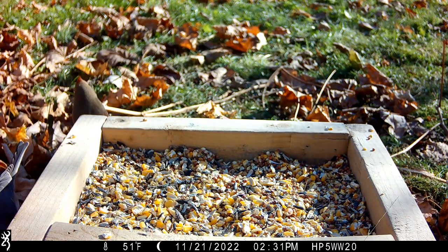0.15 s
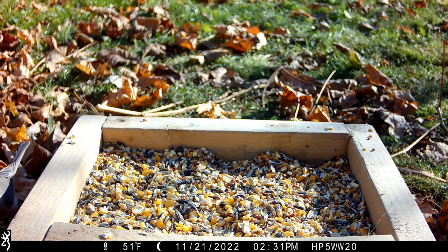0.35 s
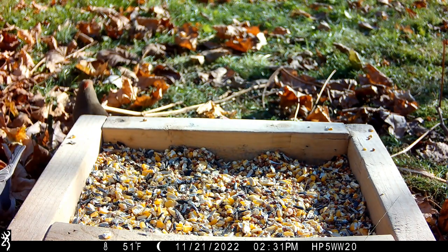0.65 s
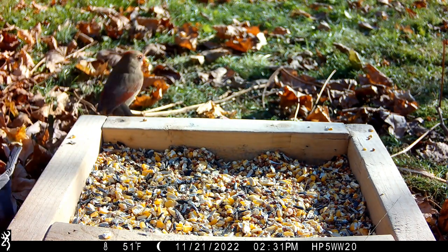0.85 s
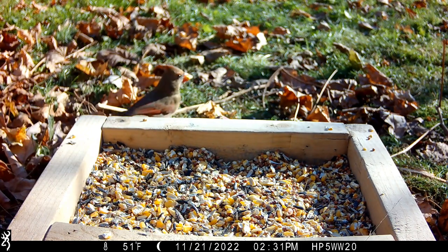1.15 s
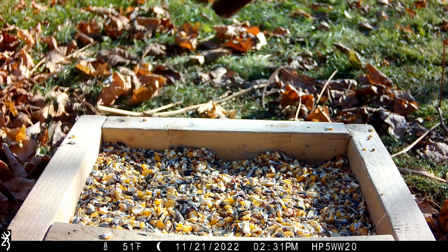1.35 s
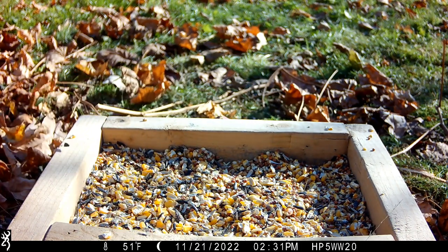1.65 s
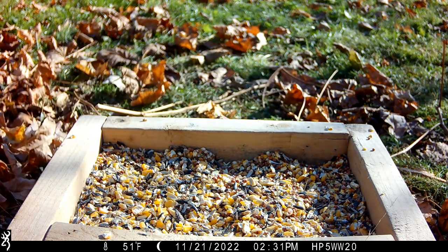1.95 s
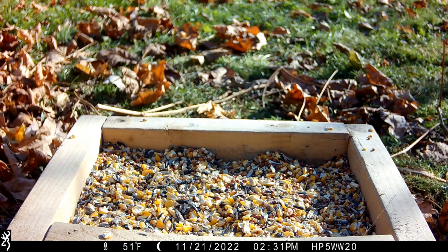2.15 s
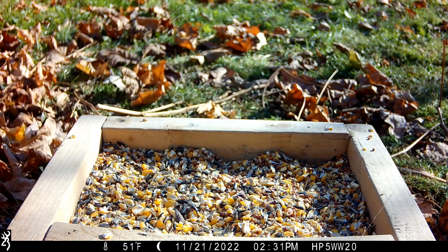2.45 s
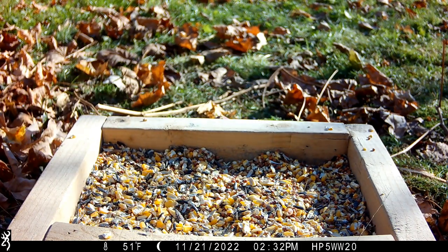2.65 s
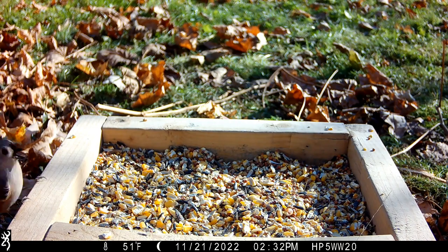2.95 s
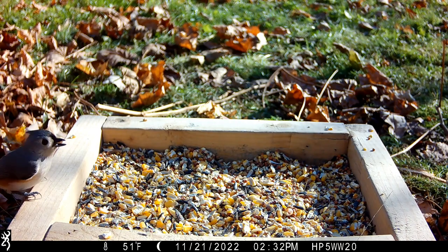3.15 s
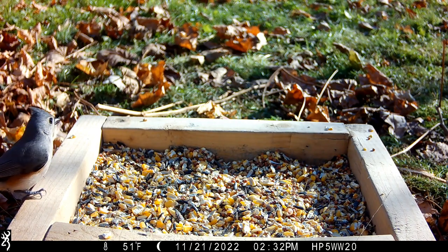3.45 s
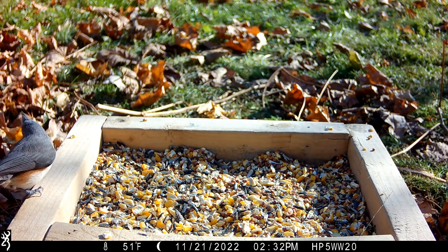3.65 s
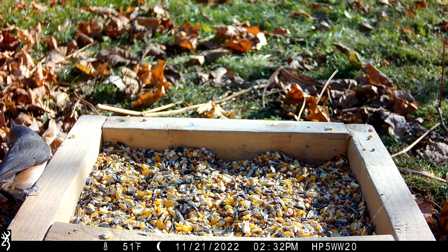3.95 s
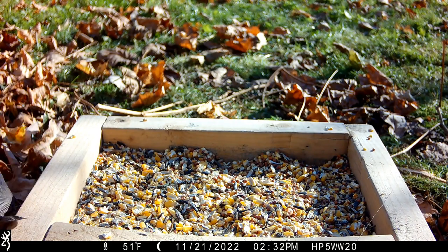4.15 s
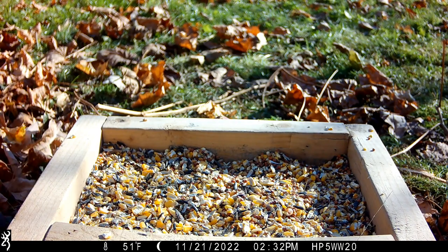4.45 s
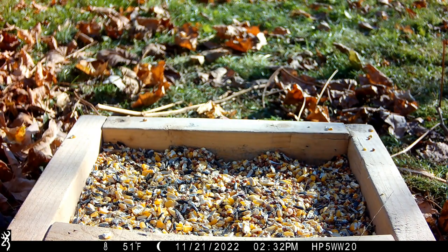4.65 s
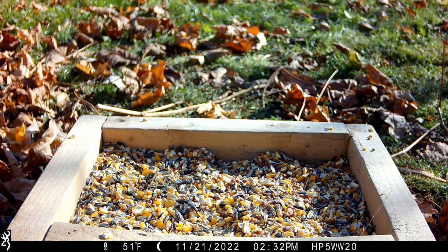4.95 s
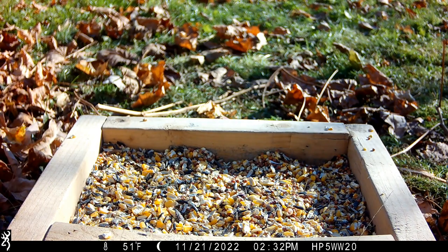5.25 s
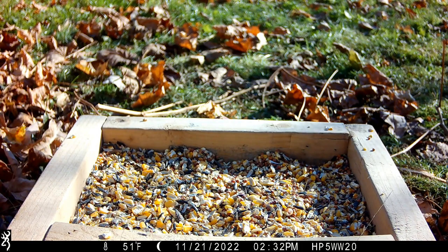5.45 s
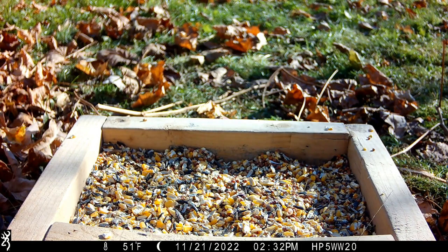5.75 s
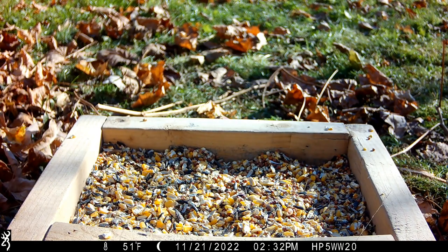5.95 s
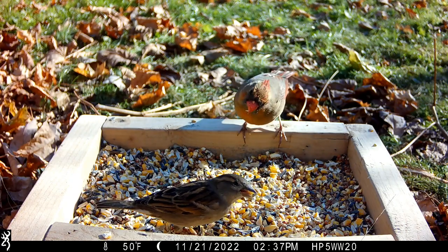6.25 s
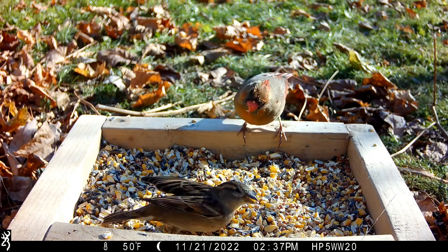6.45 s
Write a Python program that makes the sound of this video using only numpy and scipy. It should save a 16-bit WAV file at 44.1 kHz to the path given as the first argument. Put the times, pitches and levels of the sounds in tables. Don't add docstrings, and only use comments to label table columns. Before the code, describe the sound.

Close to a microphone in a quiet leafy yard, small birds flutter through dry leaves with brushing wing strokes and thin ticks, one giving a sharp high chip. After a lull, a small bird whistles high, plunges in pitch and gives three nasal buzzes. Claws then scrabble and knock on a wooden feeder tray, light rustles follow, and a last landing is cut short, leaving faint hiss.

```python
import sys
import numpy as np
from scipy import signal
from scipy.fft import rfft, irfft
from scipy.io import wavfile
from scipy.ndimage import uniform_filter1d

SR = 44100
rng = np.random.default_rng(int(sys.argv[2]) if len(sys.argv) > 2 else 0)


def wrap_up_sound(samples):
    columns = np.atleast_2d(samples).T
    tamed = np.clip(columns, -1, 1)
    steps = np.round(tamed * 32767).astype(np.int16)
    wavfile.write(sys.argv[1], SR, steps)


def elevation(decibels):
    levels = np.asarray(decibels, float)
    return 10 ** (levels / 20)


N = 291060
T = np.arange(N) / SR
CUT_S = 6.0338


def level(x, db):
    return x * elevation(db) / np.sqrt(np.mean(x ** 2))


def colour(x, points, lo=0, hi=SR):
    hz = np.linspace(1, SR / 2, 4097)
    points_hz, points_db = np.array(points).T
    db = np.interp(np.log(hz), np.log(points_hz), points_db)
    outside_hz = np.maximum(lo - hz, hz - hi)
    db = uniform_filter1d(db - 50 * np.clip(outside_hz / 400, 0, 1), size=9)
    cepstrum = irfft(db * np.log(10) / 20)
    cepstrum[1:4096] *= 2
    cepstrum[4097:] = 0
    response = irfft(np.exp(rfft(cepstrum)))
    return signal.fftconvolve(x, response)[:len(x)]


def walk(rate, count=N):
    hold = int(SR / rate)
    steps = np.repeat(rng.standard_normal(count // hold + 1), hold)
    return 1.3 * uniform_filter1d(uniform_filter1d(steps, hold), hold)[:count]


def bursts(rows, rise_s):
    env = np.zeros(N)
    for s, db, t60 in rows:
        i = int(s * SR)
        t = T[:min(N - i, SR // 4)]
        fall = elevation(-60 * t / np.clip(t60, .004, .25))
        env[i:i + len(t)] += elevation(db) * np.minimum(t / rise_s, 1) * fall
    return env


def scratch(body, edge, points, scatter_db):
    split_hz = 7500
    grains = level(rng.standard_normal(N) * elevation(scatter_db * walk(500)), 0)
    sound = 0
    for env, part in ((body, {"hi": 1.04 * split_hz}), (edge, {"lo": .96 * split_hz})):
        sound = sound + colour(grains * env, points, **part) / np.std(colour(grains, points, **part))
    return sound


def glide(rows, second_db, echo_db):
    s, hz, db = np.transpose(rows)
    i, j = int(s[0] * SR), int(s[-1] * SR)
    hz = uniform_filter1d(np.interp(T[i:j], s, hz), size=40, mode="nearest")
    phase = 2 * np.pi * np.cumsum(hz) / SR
    octave = elevation(second_db) * np.clip(hz / 7000, 0, 1) ** 3 * np.sin(2 * phase)
    flutter_db = walk(141, count=j - i)
    tone = (np.sin(phase) + octave) * np.sqrt(2) * elevation(np.interp(T[i:j], s, db) + flutter_db)
    decay = elevation(-60 * T[:SR // 4] / 0.52)
    tail = level(rng.standard_normal(SR // 4) * decay, echo_db) / np.sqrt(SR // 4)
    tail[0] = 1
    heard = signal.fftconvolve(tone, tail)
    return np.pad(heard, (i, N - i - len(heard)))


# (f/Hz, level/dB per Hz)
HISS = [(12, -53), (20, -14), (48, -23), (81, -11), (113, -14), (142, -13.5), (357, -10.5), (388, -9),
        (849, -2), (1860, -3.5), (2990, -11.5), (6540, -47), (7950, -33.5), (16000, -30)]


def yard():
    noise = rng.standard_normal(N)
    drift_db = .7 * walk(2.2) + .8 * walk(20)
    hiss = level(colour(noise * elevation(drift_db), HISS), -54)
    whine_hz, whine_width_hz = 7800, 120
    resonance = signal.iirpeak(whine_hz, whine_hz / whine_width_hz, SR)
    whine = signal.lfilter(*resonance, rng.standard_normal(N))
    return hiss + level(whine, -88)


def crackle():
    snaps_per_s, snap_db, spread_db, snap_s = 220, -3.5, 5.5, 0.001
    luck = rng.random((2, N))
    sizes = elevation(snap_db - spread_db * np.log(luck[1] + .03))
    snaps = (luck[0] < snaps_per_s / SR) * sizes
    return 1 + signal.lfilter([1], [1, -np.exp(-1 / (snap_s * SR))], snaps)


# (t/s, level/dB)
STIR = [(0, -55), (.4, -53.5), (.8, -55), (.84, -50), (1.01, -42.5), (1.344, -40.5), (1.62, -48.5),
        (1.884, -51.5), (2.1, -55.5), (2.95, -56), (2.97, -42), (3.03, -44.5), (3.2, -43), (3.24, -56),
        (4.9, -58), (5.24, -55), (5.83, -58.5), (6.6, -59.5)]
# (t/s, level/dB, brightness/dB)
STROKES = [(0.179, -57, -9), (.31, -57, -28), (0.859, -42.5, -8), (0.913, -43, -15), (0.977, -37, -9),
           (1.084, -51, -21), (1.179, -36.5, -7.5), (1.257, -37, -22), (1.342, -43.5, -30),
           (1.412, -36, -7), (1.469, -45.5, -5), (1.527, -43, -9.5), (1.566, -51.5, -6),
           (1.754, -49.5, -16), (1.791, -63, 7), (2.943, -44.5, -6.5), (3.035, -49.5, 5.5),
           (4.401, -49, -12), (4.465, -52, -11), (4.891, -60, -15), (5.06, -54, -19), (5.224, -48.5, -16),
           (5.34, -56.5, -16), (5.958, -46, -13), (6.45, -56.5, -3)]
# (t/s, peak level/dB)
TICKS = [(0.1835, -50), (0.2982, -57), (0.3985, -51), (0.4344, -43), (0.7522, -42), (1.0181, -41),
         (1.1273, -30), (1.2835, -37), (1.5, -46), (1.7494, -33), (4.5211, -53), (4.5795, -52.5),
         (5.0823, -54), (5.1228, -51), (5.1941, -43), (5.218, -50), (5.2934, -52), (5.4854, -56),
         (5.5543, -48.5), (5.6226, -46), (5.7209, -73.5), (5.8506, -47.5), (5.9329, -52)]
# (f/Hz, level/dB per Hz)
LEAVES = [(240, -43.5), (400, -17), (790, -5.5), (1400, -1), (2150, 2.5), (2900, -5), (3550, -5),
          (4400, -13), (5400, -18.5), (7600, -30.5), (10000, -22), (13700, -14.5), (16000, -17)]


def leaves():
    calm_db, calm_edge_db, edge_db_per_db = -56.5, -74, 1.51
    stroke_s = .016
    stir_db = np.interp(T, *np.transpose(STIR))
    body = elevation(stir_db)
    edge = elevation(calm_edge_db + edge_db_per_db * (stir_db - calm_db))
    for at, db, bright_db in STROKES:
        swell = elevation(db) * np.exp(-np.abs((T - at) / stroke_s) ** 2)
        body = body + swell
        edge = edge + swell * elevation(bright_db)
    snap = 1 + (crackle() - 1) * np.clip((stir_db - calm_db) / 10, .15, 1)
    thin = np.c_[TICKS, np.full(len(TICKS), .014)]
    ticks = bursts(thin, .0004) * elevation(-8)
    return scratch(body * snap ** .6, edge * snap + ticks, LEAVES, scatter_db=1.3)


# (start t/s, loudest t/s, end t/s, peak level/dB, brightness/dB)
LANDINGS = [
    (4.199, 4.215, 4.28, -12, -21),
    (4.413, 4.428, 4.475, -26.5, -22),
    (5.994, 6.024, 6.055, -19, -23),
]


def scrabbles():
    start_db, end_db, scatter_db = -9.5, -24, 1.5
    rows = []
    for start, loudest, end, db, bright_db in LANDINGS:
        time_luck, level_luck = rng.standard_normal((2, 16))
        s = np.linspace(start, end, 16) + .002 * time_luck
        shape_db = np.interp(s, [start, loudest, end], [start_db, 0, end_db])
        rows.append(np.c_[s, db + shape_db + scatter_db * level_luck, np.full(len(s), bright_db)])
    return np.vstack(rows)


# (t/s, peak level/dB, brightness/dB)
KNOCKS = [(0.184, -29.5, -17), (0.2987, -30, -29), (0.8408, -30, -11), (0.9004, -34, -14),
          (0.9383, -34, -18), (1.4127, -25, -28), (1.6347, -33.5, -13), (1.8537, -30, -14),
          (1.8679, -23, -26), (2.1864, -34.5, -25), (2.988, -29, -21), (3.003, -20.5, -32.5),
          (3.058, -22, -24.5), (4.197, -22, -14), (4.2277, -14.5, -11), (4.3304, -34, -24),
          (4.3884, -27.5, -27), (4.4123, -19.5, -20), (4.511, -28.5, -25), (4.5234, -41, -19),
          (4.892, -49, 0), (5.133, -34, -29), (5.1484, -30, -26), (5.1791, -33, -27), (5.2385, -18, -34),
          (5.244, -23.5, -29), (5.2616, -29, -20), (5.3105, -32, -26), (5.99, -31, -19),
          (6.0156, -12.5, -28)]
# (f/Hz, level/dB per Hz)
TRAY = [(300, -41), (600, -22.5), (1200, -11.5), (1600, -7.5), (2000, -1.5), (2350, -4.5), (2950, -19.5),
        (3650, -10), (4300, -25), (5500, -32), (7500, -46), (10000, -31.5), (12500, -23), (16000, -28)]


def tray():
    s, db, bright_db = np.vstack([KNOCKS, scrabbles()]).T
    ring_s = np.full(len(s), 0.035)
    body = bursts(np.c_[s, db, ring_s], 0.001053) * elevation(-8.5)
    edge = bursts(np.c_[s, db + bright_db, .9 * ring_s], .0006) * elevation(-1.5)
    knocks = scratch(body, edge, TRAY, scatter_db=-1.0)
    return knocks * ((T < CUT_S) | (T > CUT_S + .3))


# (start t/s, length t/s, first f/Hz, top f/Hz, level/dB)
CHIPS = [
    (0.8186, 0.016, 5930, 8100, -26.5),
    (2.13, .032, 5940, 7700, -53),
]
# (second partial level/dB, echo level/dB)
CHIP_OVERTONES = [(-12, -30), (-6, -8)]


def chips():
    glide_s, attack_s, accent_s, sink_db = 0.0066, 0.0043, 0.0034, -5.5
    sound = 0
    for (start_s, length_s, first_hz, top_hz, db), overtones in zip(CHIPS, CHIP_OVERTONES):
        t = np.linspace(0, length_s, 40)
        hz = top_hz - (top_hz - first_hz) * np.exp(-t / glide_s)
        corners_s = [0, 0.31 * attack_s, attack_s, attack_s + accent_s]
        accent_db = np.interp(t, corners_s, [-35, -8, 0, sink_db])
        fade_db = -10 * np.clip(1 - (length_s - t) / accent_s, 0, 1)
        sound = sound + glide(np.c_[start_s + t, hz, db + accent_db + fade_db], *overtones)
    return sound


# (t/s, level/dB, build-up t/s, dying t/s)
PUFFS = [(1.078, -51, 0.074, 1.3), (1.38, -49, .07, 0.16), (1.774, -50.5, 0.1, 0.061), (2.2, -75, .9, 2.1),
         (2.938, -56, 0.19, 0.11), (3.314, -69, 0.6, .1)]
# (f/Hz, level/dB per Hz)
AIR = [(15, -4), (30, 6.5), (110, -2.5), (280, 3.5), (380, 0), (550, -48)]


def wings():
    wingbeat_hz, range_db = 18, -37.5
    beat = 2 * np.pi * np.cumsum(wingbeat_hz * (1 + .15 * walk(3.3))) / SR
    air = level(colour(rng.standard_normal(N), AIR) * elevation(7.9 * np.cos(beat)), 0)
    puffs = 0
    for s, db, rise_s, fall_s in PUFFS:
        distance = np.maximum((s - T) / rise_s, (T - s) / fall_s)
        puffs = puffs + elevation(db + range_db * distance)
    return air * puffs


# (t/s, f/Hz, level/dB)
ARCH = [(2.624, 2650, -60), (2.633, 2710, -43), (2.644, 2900, -51), (2.66, 3500, -42), (2.674, 3950, -48),
        (2.688, 4150, -50), (2.705, 3900, -45), (2.724, 3420, -47), (2.736, 3200, -62)]


def far_note():
    return glide(ARCH, second_db=-40, echo_db=-13)


# (t/s, f/Hz, level/dB)
WHISTLE = [(2.963, 7300, -55), (2.978, 8000, -33), (2.99, 8300, -29), (3.003, 8320, -20),
           (3.015, 8330, -25), (3.026, 8480, -24), (3.034, 8300, -23)]
# (t/s, f/Hz, level/dB)
PLUNGE = [(3.037, 7700, -31), (3.04, 6200, -31), (3.0422, 4300, -27), (3.0437, 3400, -13),
          (3.0455, 2600, -20), (3.048, 1900, -28), (3.052, 1500, -45)]


def whistle():
    return glide(WHISTLE + PLUNGE, second_db=-14, echo_db=-38)


# (t/s, f/Hz, level/dB)
CLUCK = [(3.045, 3020, -49), (3.0475, 3660, -24), (3.052, 2570, -30.5), (3.055, 2300, -35)]


def cluck():
    return glide(CLUCK, second_db=-30, echo_db=-30)


# (t/s, low side f/Hz, high side f/Hz)
VOICES = [
    [(3.088, 800, 1190), (3.105, 850, 1270), (3.118, 860, 1324), (3.132, 815, 1340), (3.16, 832, 1360),
     (3.2, 912, 1479), (3.218, 917, 1492), (3.236, 820, 1350)],
    [(3.274, 850, 1200), (3.31, 804, 1340), (3.33, 855, 1414), (3.35, 896, 1478), (3.39, 925, 1540),
     (3.412, 953, 1584), (3.422, 935, 1570), (3.44, 820, 1330)],
    [(3.526, 830, 1220), (3.542, 795, 1295), (3.56, 825, 1375), (3.58, 891, 1465), (3.6, 915, 1536),
     (3.62, 946, 1564), (3.66, 966, 1586), (3.67, 940, 1570), (3.686, 830, 1400)],
]
# (level/dB, breath level/dB, settled roughness 0-1)
MANNER = [
    (-21.5, -11, 0.47),
    (-21.5, -5, 0.17),
    (-21.5, -3.5, 0.19),
]
# (level/dB, ..)
LOW_PARTIALS_DB = [
    [0, -2.5, 2, 1.2, 3.5, -15, -23, -16, -18, -6, -15],
    [0, -3, 0.54, 0.6, -6.5, -21, -7, -6, -21, -6, -19],
    [0, -14.5, 3.2, 0.77, -2.5, -5.5, -21, -20, -19, -16, -14],
]
# (level/dB, ..)
HIGH_PARTIALS_DB = [
    [0, -0.2, -1, -14, -18, 0, -7],
    [0, -2, -0.36, -16, -5.5, -16.5, -18],
    [0, -0.6, 1, -11, -21, -22, -21],
]
# (f/Hz, level/dB)
THROAT = [(600, -53), (900, -17), (1500, -6), (1900, -0.5), (2200, -3), (2680, 6.5), (3050, -6.5),
          (3700, -7), (4500, -22.5), (5800, -20.5), (7200, -26.5), (9000, -26), (11500, -38.5),
          (14000, -30)]


def buzz(rows, manner, low_db, high_db):
    attack_s, attack_db, release_s, release_db, swell_db = 0.016, -9, .011, -18, 2.1
    settle_s, fray_s = .04, .014
    s, low_hz, high_hz = np.transpose(rows)
    db, breath_db, settled = manner
    i, j = int(s[0] * SR), int(s[-1] * SR)
    t, count = T[i:j], j - i
    since, until = t - T[i], T[j] - t

    unsettled = np.maximum(np.exp(-(since / settle_s) ** 2), np.exp(-(until / fray_s) ** 2))
    rough = settled + (1 - settled) * unsettled
    effort_db = db + swell_db * (since / since[-1] - .5)
    effort_db += attack_db * np.clip(1 - since / attack_s, 0, 1)
    effort_db += release_db * np.clip(1 - until / release_s, 0, 1)

    low_hz = np.interp(t, s, low_hz) * (1 + .03 * rough * walk(300, count=count))
    high_hz = np.interp(t, s, high_hz) * (1 + .036 * rough * walk(300, count=count))
    low_phase = 2 * np.pi * np.cumsum(low_hz) / SR
    high_phase = 2 * np.pi * np.cumsum(high_hz) / SR
    lines = 0
    for m, low in enumerate(low_db):
        for n, high in enumerate(high_db):
            size = elevation(low + high + 4.5 * rough * walk(90, count=count))
            start = 0.664 * m * m + 0.975 * n * n
            sum_line = np.cos(m * low_phase + n * high_phase + start)
            difference_line = elevation(-24) * np.cos(m * low_phase - n * high_phase)
            lines = lines + size * (sum_line + difference_line)

    breath = elevation(breath_db) * (rough + .3) * np.abs(lines) * rng.standard_normal(count)
    voice = colour(lines + breath, THROAT)
    voice /= np.sqrt(uniform_filter1d(voice ** 2, size=600))
    edge = np.clip(np.minimum(since, until) / 0.0073, 0, 1)
    return np.pad(voice * elevation(effort_db) * edge, (i, N - j))


def scene():
    birds = sum(buzz(*call) for call in zip(VOICES, MANNER, LOW_PARTIALS_DB, HIGH_PARTIALS_DB))
    birds = birds + chips() + far_note() + whistle() + cluck()
    return np.tile(birds + leaves() + tray() + wings() + yard(), (2, 1))


def top_cut(x):
    return signal.sosfilt(signal.butter(12, 17020, fs=SR, output="sos"), x)


def record(dry):
    fade_in_s, top_hz = .014, 15800
    after = np.clip((T - CUT_S) / fade_in_s, .4, 1)
    gain = np.where(T < CUT_S, 1, after)
    low_pass = signal.ellip(12, .3, 80, top_hz, fs=SR, output="sos")
    return top_cut(signal.sosfilt(low_pass, dry * gain))


dry = scene()
out = record(dry)
wrap_up_sound(out)
```